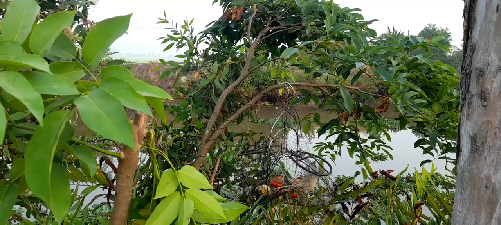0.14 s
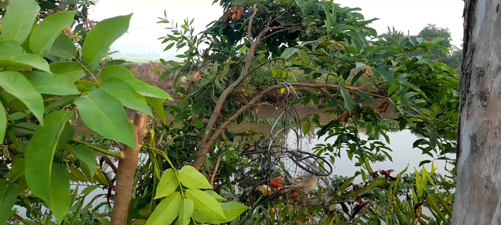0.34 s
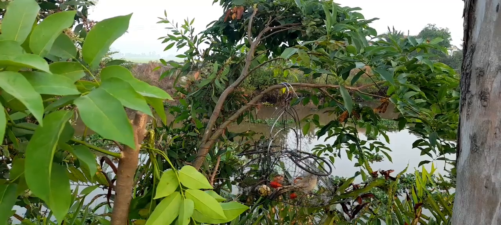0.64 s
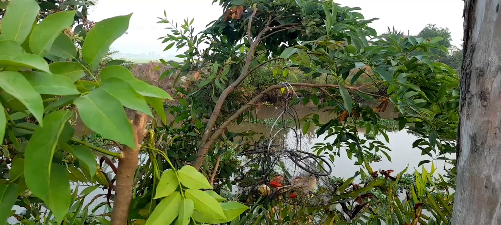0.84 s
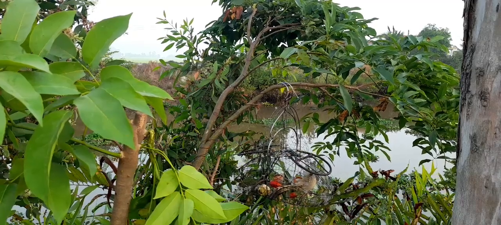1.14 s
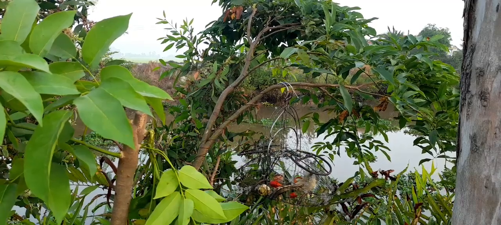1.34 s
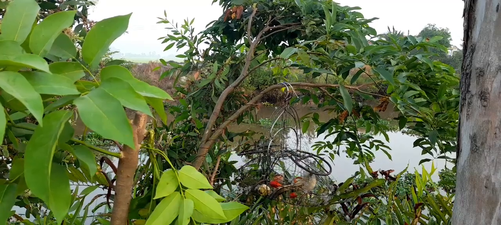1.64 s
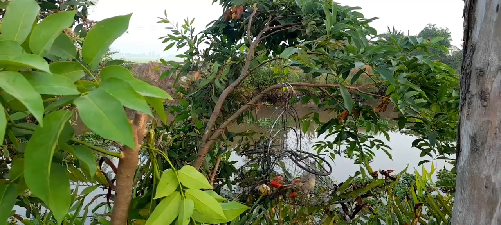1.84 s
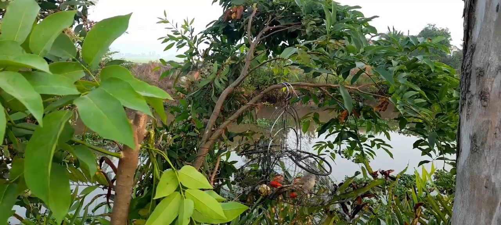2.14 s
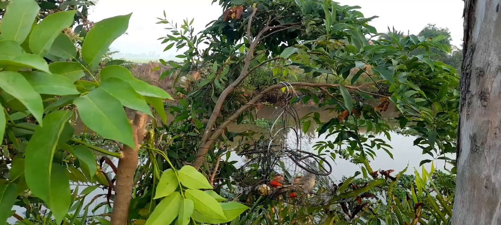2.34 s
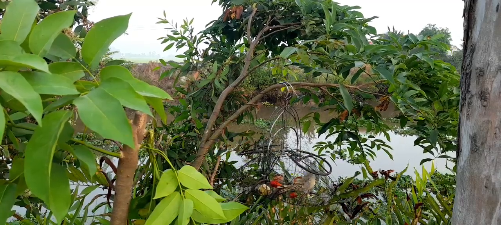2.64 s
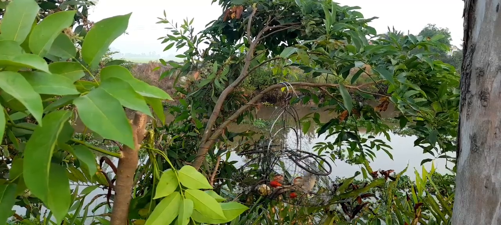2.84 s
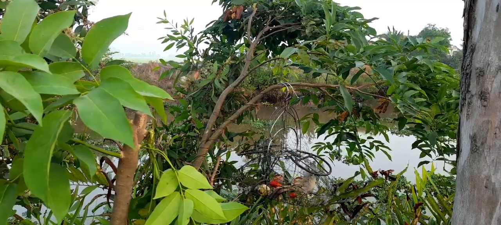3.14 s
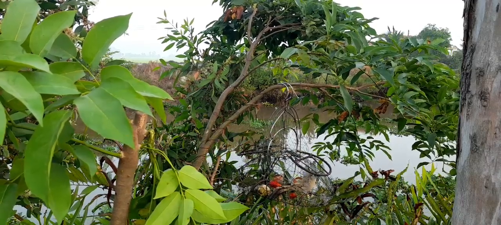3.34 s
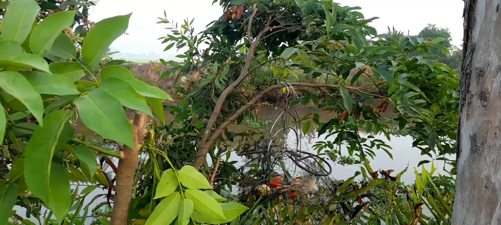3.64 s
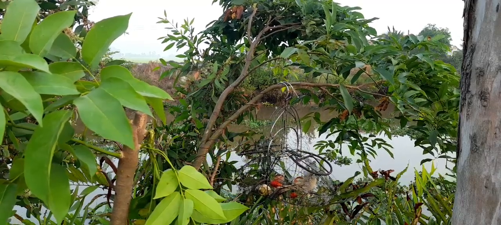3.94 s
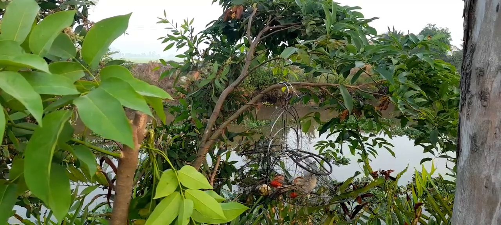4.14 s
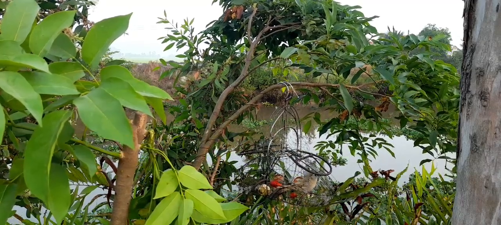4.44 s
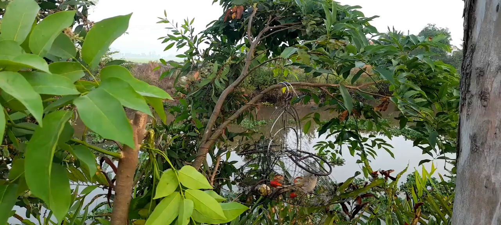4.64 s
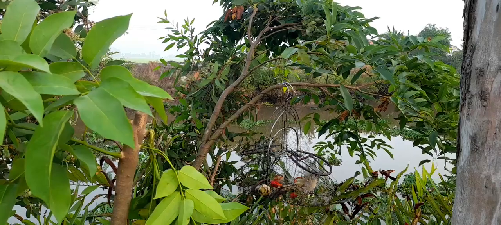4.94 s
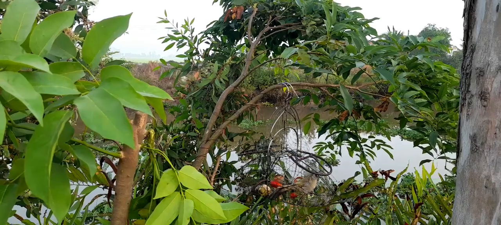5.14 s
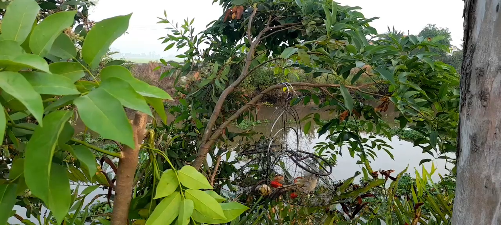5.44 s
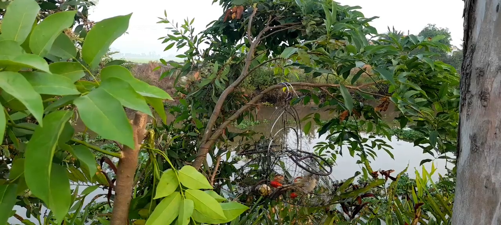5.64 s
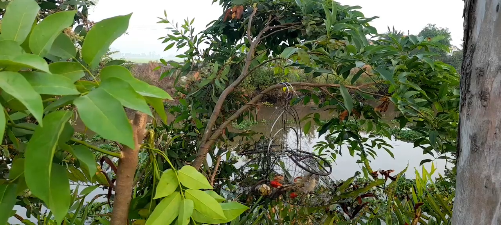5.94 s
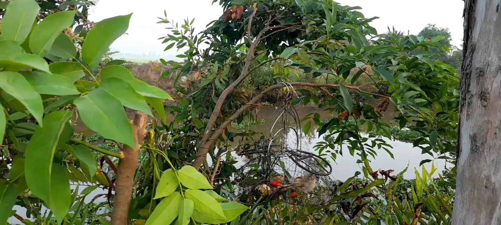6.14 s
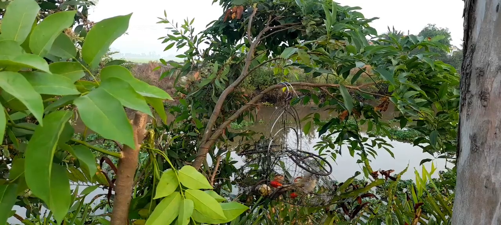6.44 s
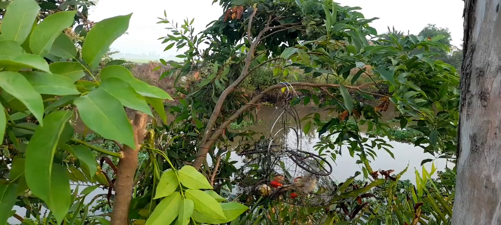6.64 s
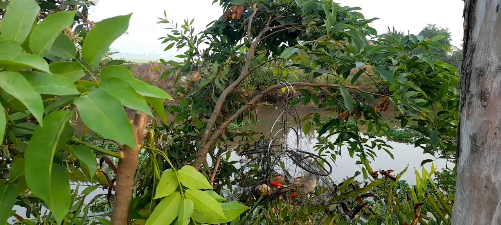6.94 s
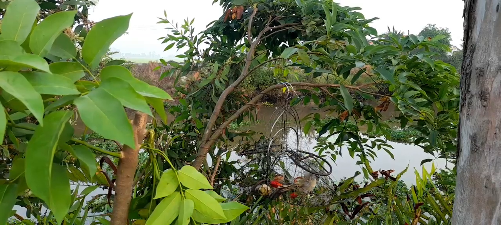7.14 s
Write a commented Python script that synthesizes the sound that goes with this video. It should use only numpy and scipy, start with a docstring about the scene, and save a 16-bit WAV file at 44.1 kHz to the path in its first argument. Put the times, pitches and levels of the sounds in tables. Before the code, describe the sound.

A single-cylinder motorbike is already receding on the right as a second putters in from the left, passes at about two and a half seconds with low thuds, light ticking, chain whirr and tyre noise, then speeds up and fades right. Short rasping chirps, slurred whistles and clear peeps come from nearby bushes. Outdoor stereo microphone, with slight wind rumble and a low, steady hush.

```python
"""From the start a single-cylinder motorbike fades away to the right of a riverside garden: filtered firing pulses.
Light gusts, low noise, rumble on two microphone ports over a steady hush; a second bike putters by from left to
right, its valves ticking as noise bursts struck by the firings. Soon birds in the bushes give rasping chirps
(gliding tones with side tones), then slurred whistles and later peeps (clear glides); far ones sing arched notes."""
import sys
import numpy as np
from scipy import signal
from scipy.fft import rfft, irfft, next_fast_len
from scipy.io import wavfile
from scipy.ndimage import uniform_filter1d, map_coordinates

SR = 44100
rng = np.random.default_rng(int(sys.argv[2]) if len(sys.argv) > 2 else 0)


def pcm_store(signal):
    """Save signal as 16-bit PCM."""
    levels = np.round(np.clip(np.atleast_2d(signal), -1, 1) * 32767)
    wavfile.write(sys.argv[1], SR, levels.astype(np.int16).T)


N = 321930
TIME = np.arange(N) / SR


def amp(db):
    """Decibels to gain."""
    return 10 ** (np.asarray(db) / 20)


def unit(x):
    """Scale to rms 1."""
    return x / np.sqrt(np.mean(x ** 2) + 1e-20)


def since(s):
    """Seconds elapsed after a moment, zero before it."""
    return np.maximum(TIME - s, 0)


def along(points, hz):
    """Interpolate (frequency [Hz], value) points on a log-frequency axis."""
    f, v = np.transpose(points)
    return np.interp(np.log(hz + 1), np.log(f + 1), v)


def curves(rows, at=TIME):
    """One curve for each column after the first."""
    s, *cols = np.transpose(rows)
    return [np.interp(at, s, c) for c in cols]


def wobble(rate_hz):
    """Smooth random curve with rate_hz knots a second."""
    knots = rng.standard_normal(int(N * rate_hz / SR) + 4)
    return map_coordinates(knots, [TIME * rate_hz])


def colour(x, spectrum):
    """Minimum-phase filter through (frequency [Hz], level [dB]) points; the result has rms 1."""
    m = 2 * next_fast_len(N // 2 + SR // 4)
    gain = amp(along(spectrum, np.fft.rfftfreq(m, 1 / SR)))
    # folding the cepstrum makes the filter causal
    cepstrum = irfft(np.log(gain), m)
    cepstrum[1:m // 2] *= 2
    cepstrum[m // 2 + 1:] = 0
    response = np.exp(rfft(cepstrum))
    return unit(irfft(rfft(x, m) * response, m)[..., :N])


def delayed(x, delay_s):
    """x arriving later by a steady or moving delay."""
    return map_coordinates(x, [(TIME - delay_s) * SR], order=3)


PORT_LAG_S = .0005


def placed(x, bearing, right_db):
    """A source at bearing -1 (left) to 1 (right) reaches the nearer port first; right_db favours the right."""
    left = delayed(x, bearing * PORT_LAG_S / 2) * amp(-right_db / 2)
    right = delayed(x, -bearing * PORT_LAG_S / 2) * amp(right_db / 2)
    return np.array([left, right])


def rush(spectrum, bearing, right_db, scatter):
    """Noise from one direction, with a power share scattered by the foliage."""
    direct, *diffuse = colour(rng.standard_normal((3, N)), spectrum)
    scatter = np.clip(scatter, 0, 1)
    return np.sqrt(1 - scatter) * placed(direct, bearing, right_db) + np.sqrt(scatter) * np.array(diffuse)


def firings(rate_hz, first_s):
    """Moments at which an engine with this firing rate completes a cycle."""
    cycles = np.cumsum(rate_hz) / SR
    cycles -= np.interp(first_s, TIME, cycles)
    return np.interp(np.arange(int(cycles[-1]) + 1), cycles, TIME)


def pulses(times, jitter_s, uneven_db):
    """One impulse per firing, uneven in time and size."""
    chance = rng.standard_normal((len(times), 2))
    at = np.clip((times + jitter_s * chance[:, 0]) * SR, 0, N - 1).astype(int)
    return np.bincount(at, amp(uneven_db * chance[:, 1]), N)


def bursts(beats, snap_s, tail_s, tail_db, steady_db):
    """Envelope of noise struck once a cycle: a snap, a tail and a steady bed; rms 1."""
    t = TIME[:SR // 16]
    decay = np.exp(-t / snap_s) + amp(tail_db) * np.exp(-t / tail_s)
    shape = decay * (1 - np.exp(-t / 0.00019))
    return unit(signal.fftconvolve(beats, shape)[:N] + amp(steady_db))


# firing rate: (time [s], rate [1/s])
LEAVING_RATE = [(0, 23.78), (.5, 24.06), (1, 24.51), (1.9, 24.22)]
# exhaust, whirr and valve tick spectra: (frequency [Hz], relative level [dB])
LEAVING_PUFF_SPECTRUM = [(25, -56.5), (60, -8), (115, 6.5), (150, -1), (195, -9.5), (310, 4), (430, -10),
                         (530, -7), (750, -12), (1100, -20.5), (3000, -68)]
LEAVING_WHIRR_SPECTRUM = [(400, -17), (800, 10), (1200, -4), (1700, 2.5), (2400, 0.5), (2950, -3.5),
                          (3600, -3.5), (4500, -4.5), (8000, -16.5), (13000, -14), (16000, -76)]
TICK_SPECTRUM = [(2000, -28.5), (3800, -9.5), (6000, -1), (8100, -10), (9500, -4), (12500, 2.5),
                 (15200, 1.5), (16000, -8.5)]
LEAVING_DB, RECEDE_DB_PER_S, HIDDEN_S, HIDDEN_DB_PER_S = -33.5, 4, 2.9, 24


def leaving_bike(whine_hz=2500, whine_db=-15):
    """A slower exhaust recedes on the right, with whirr, faint valve ticks and a thin whine from its gears."""
    times = firings(curves(LEAVING_RATE)[0], first_s=.0165)
    puffs = pulses(times, jitter_s=.00015, uneven_db=1)
    # a roadside wall returns each puff
    echoed = puffs + 0.14 * delayed(puffs, 0.01162)
    exhaust = -colour(echoed, LEAVING_PUFF_SPECTRUM)
    gate = bursts(puffs, snap_s=.002, tail_s=.012, tail_db=-10, steady_db=-15)
    gas = amp(-10) * colour(gate * rng.standard_normal(N), LEAVING_PUFF_SPECTRUM)
    whirr = amp(-10) * bursts(puffs, snap_s=.001, tail_s=.004, tail_db=-4, steady_db=-6)
    whirr = whirr * rush(LEAVING_WHIRR_SPECTRUM, .95, right_db=1.5, scatter=.55)
    ticks = amp(-17.5) * bursts(puffs, snap_s=.003, tail_s=.009, tail_db=-6, steady_db=-5)
    ticks = ticks * rush(TICK_SPECTRUM, 0.9, right_db=6, scatter=0.76)
    whine_phase = 2 * np.pi * whine_hz * TIME + 1.4 * wobble(90)
    whine = amp(whine_db) * wobble(160) * np.sin(whine_phase)
    level_db = LEAVING_DB - RECEDE_DB_PER_S * TIME - HIDDEN_DB_PER_S * since(HIDDEN_S)
    return amp(level_db) * (placed(exhaust + gas + whine, 0.99, right_db=1.0) + whirr + ticks)


# gusts on the ports: (time [s], half-width [s], relative peak [dB])
GUST_TIMES = [(.18, 0.23, -31), (1.65, 0.03, -31.5), (6.2, 0.066, -37.5), (6.46, 0.058, -36),
              (7.24, 0.091, -41)]
# port rumble; far traffic and leaves: (frequency [Hz], relative level [dB])
BUFFET_SPECTRUM = [(20, -37), (45, -6.5), (70, -7.5), (95, 0.5), (130, -10.5), (200, -28), (500, -55)]
AIR_SPECTRUM = [(15, -38), (25, 1), (87, 1.5), (149, -14.5), (206, -12.5), (317, -22.5), (936, -36),
                (1480, -39), (3160, -75), (4610, -37), (7710, -63), (14000, -63), (16000, -65)]
BREEZE_DB, CALMING_DB_PER_S = -41.5, 1.4  # wind between gusts


def breeze():
    """Gusts swell from a dying breeze and rumble on the ports, increasingly the right, over an outdoor hush."""
    gusts = sum(amp(db) / (1 + ((TIME - s) / width_s) ** 4) for s, width_s, db in GUST_TIMES)
    strength = np.hypot(gusts, amp(BREEZE_DB - CALMING_DB_PER_S * TIME))
    right_db = np.interp(TIME, [2, 6.2], [1, 9])
    buffet = strength * amp(1.1 * wobble(12)) * rush(BUFFET_SPECTRUM, -.5, right_db, scatter=.25)
    hush = amp(-44 + 1.9 * wobble(1.73)) * rush(AIR_SPECTRUM, 0.68, right_db=6.5, scatter=0.43)
    return buffet + hush


def pass_by(peak_db, loudest_s, width_s, open_s, hidden_s, emerge_db, vanish_db):
    """Level in dB of a passing source: it falls with distance, and faster while screened."""
    screened_db = emerge_db * np.maximum(open_s - TIME, 0) + vanish_db * since(hidden_s)
    return peak_db - 10 * np.log10(1 + ((TIME - loudest_s) / width_s) ** 2) - screened_db


# puffs from the side and from behind; chamber resonance: (frequency [Hz], relative level [dB])
ABREAST_SPECTRUM = [(25, 10), (60, -42), (88, -2), (120, 5.5), (148, 5.5), (180, -3), (225, -10.5),
                    (315, -15), (400, -19.5), (700, -19.5), (1200, -27.5), (3000, -54)]
ASTERN_SPECTRUM = [(25, -19), (60, -7.5), (95, 5), (150, -2), (235, -14.5), (290, -12.5), (340, -10.5),
                   (420, -23), (550, -38.5), (730, -35), (1200, -32.5), (3000, -73)]
SILENCER_SPECTRUM = [(100, -7.5), (240, -17), (290, -4.5), (318, 2), (348, -5.5), (400, -31), (800, -52.5)]
# exhaust beams backward; bushes and rider screen it outside a span: (relative peak [dB], loudest at [s],
# half-width [s], open from [s], open until [s], emerging [dB/s], vanishing [dB/s])
EXHAUST_PASSAGE = (-26, 3, 0.69, 2.5, 5.5, 2.5, 4.5)


def passing_exhaust(puffs):
    """Puffs turn from side to rear colour, ring the silencer's chamber and drag turbulent gas behind them."""
    behind = np.clip((TIME - 3.3) / 1.07, 0, 1)
    exhaust = -((1 - behind) * colour(puffs, ABREAST_SPECTRUM) + behind * colour(puffs, ASTERN_SPECTRUM))
    # ring against puff is strongest as the pipe's mouth turns towards the garden
    ring_db = np.interp(TIME, [1.5, 3, 4.1, 5.5], [-9.0, -13.5, -7.0, -15.5])
    exhaust -= amp(ring_db) * colour(puffs, SILENCER_SPECTRUM)
    gate = bursts(puffs, snap_s=.005, tail_s=.012, tail_db=-3, steady_db=-9)
    gas_spectrum = [(60, -14), (130, -3), (220, -8), (320, 0), (420, -12), (700, -17), (1500, -40)]
    exhaust += amp(-21) * colour(gate * rng.standard_normal(N), gas_spectrum)
    return amp(pass_by(*EXHAUST_PASSAGE)) * exhaust


# (relative peak [dB], loudest at [s], half-width [s], open from [s], open until [s],
# emerging [dB/s], vanishing [dB/s])
BOOM_PASSAGE = (-29.5, 2.5, 0.8, 1.23, 4.5, 27, 8.5)


def crank_boom(puff_times):
    """A cosine at two cycles per firing, locked to the puffs."""
    crank = 2 * np.interp(TIME - .004, puff_times, np.arange(len(puff_times)))
    level_db = pass_by(*BOOM_PASSAGE) + 1.2 * wobble(5.83)
    return np.sqrt(2) * np.cos(2 * np.pi * crank) * amp(level_db)


# ticks beam forward; sharp and blurred parts: (relative peak [dB], loudest at [s], half-width [s],
# open from [s], open until [s], emerging [dB/s], vanishing [dB/s])
TICK_PASSAGE = (-43.6, 1.55, .8, 1.47, 3.9, 44, 14)
BLUR_PASSAGE = (-51, 3.05, 1.18, 3, 5.5, 1, 10)


def valve_ticks(valves, bearing):
    """Noise struck by the valves, sharpest from the front; from behind the rider screens it."""
    sharp = bursts(valves, snap_s=.001, tail_s=.007, tail_db=-17, steady_db=-26)
    blurred = bursts(valves, snap_s=0.0014, tail_s=0.0094, tail_db=-11, steady_db=2)
    clatter = amp(pass_by(*TICK_PASSAGE)) * sharp + amp(pass_by(*BLUR_PASSAGE)) * blurred
    return amp(2.0) * clatter * rush(TICK_SPECTRUM, bearing, right_db=5, scatter=0.62)


# (frequency [Hz], relative level [dB])
WHIRR_SPECTRUM = [(600, -27.5), (1100, -5.5), (1650, 6), (2300, -0.5), (2950, -4.5), (3450, 3.5),
                  (4000, 2.5), (4800, 1.5), (6300, -1), (7600, -14.5), (11000, -59), (16000, -11)]
# (relative peak [dB], loudest at [s], half-width [s], open from [s], open until [s],
# emerging [dB/s], vanishing [dB/s])
WHIRR_PASSAGE = (-44.5, 3, 0.87, 0, 5.5, -1, 6.5)


def engine_whirr(valves, bearing):
    """Engine whirr, pulsing gently with the engine cycle."""
    pulse = bursts(valves, snap_s=0.00092, tail_s=0.022, tail_db=13.0, steady_db=13)
    noise = rush(WHIRR_SPECTRUM, bearing, right_db=1.2 * bearing + 8.5, scatter=0.42)
    return amp(pass_by(*WHIRR_PASSAGE) + 2) * pulse * noise


# (frequency [Hz], relative level [dB])
TYRE_SPECTRUM = [(120, -25.5), (300, 9), (450, 1), (550, 0), (620, -2.5), (700, 2), (790, -6), (880, -1),
                 (1200, -2), (2000, -7.5), (3000, -15), (5000, -24), (9000, -30.5)]
# (relative peak [dB], loudest at [s], half-width [s], open from [s], open until [s],
# emerging [dB/s], vanishing [dB/s])
TYRE_PASSAGE = (-42, 2.5, 0.62, -1, 5.5, -8, 4)


def tyre_noise(bearing):
    """Rolling noise with a slightly unsteady level."""
    level_db = pass_by(*TYRE_PASSAGE) + 7 + 0.5 * wobble(9)
    return amp(level_db) * rush(TYRE_SPECTRUM, bearing, right_db=1.0, scatter=0.14)


FIRST_FIRING_S, START_RATE_HZ, CREEP_HZ_PER_S = .0095, 28.0406, .3301
THROTTLE_S, THROTTLE_HZ_PER_S = 2.828, .881  # the rider opens the throttle: extra gain in firing rate


def passing_bike(abreast_s=2.401, crossing_s=0.75):
    """Exhaust puffs, crank boom, valve ticks, engine whirr and tyres cross from left to right."""
    bearing = (TIME - abreast_s) / np.hypot(TIME - abreast_s, crossing_s)
    rate_hz = START_RATE_HZ + CREEP_HZ_PER_S * TIME + THROTTLE_HZ_PER_S * since(THROTTLE_S)
    times = firings(rate_hz, FIRST_FIRING_S)
    # the pipe is at the tail, so its puff trails the valve tick while the bike approaches
    puff_times = times + np.interp(times, [2.7, 3.9], [.005, .0005])
    puffs = pulses(puff_times, jitter_s=0.000089, uneven_db=1.0)
    valves = pulses(times, jitter_s=.0002, uneven_db=2.8)
    low = placed(passing_exhaust(puffs) + crank_boom(puff_times), bearing, right_db=2)
    return low + valve_ticks(valves, bearing) + engine_whirr(valves, bearing) + tyre_noise(bearing)


def gesture(shape, length_s):
    """Progress 0-1 through a call, then its smoothed control curves."""
    u = np.linspace(0, 1, int(length_s * SR))
    return u, *uniform_filter1d(np.array(curves(shape, u)), size=130, axis=1)


def tremble(u):
    """Random unsteadiness over one call."""
    return map_coordinates(rng.standard_normal(16), [u * 15])


# (share of the call [0-1], pitch ratio, relative level [dB], rasp [0-1])
CHIRP_SHAPE = [(0, 1.22, -15, 0.53), (.098, 1.1, -1, 0.11), (.218, .9, -7, 1), (.34, .82, -3.5, 1),
               (.462, .92, -12.5, 1), (.57, 1.1, 2, 0.04), (.699, 1.02, -1.5, 0.4),
               (.85, 0.81, -10.5, 0.33), (1, 1.025, -8, 1)]
# throat of the rasping birds: (frequency [Hz], relative level [dB])
THROAT_SPECTRUM = [(1700, 10), (2500, 2.5), (3300, 1.5), (4200, -4), (5200, -14.5), (6500, -20.5)]


def chirp(length_s, hz, second_hz, rasp_db):
    """A gliding tone to which a second voice in the syrinx adds rasping side tones."""
    u, ratio, level_db, rasp = gesture(CHIRP_SHAPE, length_s)
    ratio = ratio * (1 + .028 * (.2 + rasp) * tremble(u))
    turn = 2 * np.pi * np.cumsum(ratio) / SR
    tone = np.sin(hz * turn)
    # side tones are spaced evenly above the main tone and shaped by the throat
    for k in range(1, 5):
        side_hz = hz + k * second_hz / ratio.min()
        side_db = rasp_db + along(THROAT_SPECTRUM, side_hz * ratio) + 4 * tremble(u)
        tone += rasp * amp(side_db) * np.sin(side_hz * turn + rng.uniform(0, 2 * np.pi))
    return amp(level_db) * tone


SETTLE_SHARE = .45  # of the call


def note(shape, length_s, hz, overtone_db=-30, sharp=0):
    """One clear gliding tone with an octave overtone, which may start high and settle."""
    u, ratio, level_db = gesture(shape, length_s)
    settling = 1 + sharp * np.maximum(1 - u / SETTLE_SHARE, 0)
    ratio = ratio * settling * (1 + .028 * 0.48 * tremble(u))
    phase = 2 * np.pi * hz * np.cumsum(ratio) / SR
    return amp(level_db) * (np.sin(phase) + amp(overtone_db) * np.sin(2 * phase))


def sung(calls):
    """Lay (time [s], level [dB], sound) calls out in time, with soft edges."""
    out = np.zeros(N + SR)
    for s, db, sound in calls:
        edges = signal.windows.tukey(len(sound), .1)
        out[round(s * SR):][:len(sound)] += np.sqrt(2) * amp(db) * sound * edges
    return out[:N]


# rasping chirps: (time [s], length [s], base pitch [Hz], relative level [dB],
# second voice [Hz], relative rasp level [dB])
CHIRP_CALLS = [(0.153, 0.056, 2244, -35.5, 765, 6), (0.174, 0.023, 2640, -35.5, 625, 9.5),
               (.401, 0.054, 2465, -29.5, 980, 0), (2.853, 0.054, 2080, -32.5, 756, 3),
               (2.877, 0.034, 2492, -29.5, 550, -6), (4.373, 0.059, 2337, -28.5, 964, -1.5),
               (5.429, 0.056, 2355, -31.5, 1030, 0.5), (5.655, 0.05, 2504, -30.5, 980, -2),
               (6.837, .047, 1920, -57, 332, -5), (6.867, 0.045, 1560, -58, 237, -8)]
# slurred whistles: (time [s], length [s], relative level [dB], share by which the pitch starts high)
WHISTLE_CALLS = [(1.342, 0.12, -32.5, 0), (1.892, 0.089, -31.5, 0.088), (3.45, .116, -31.5, 0.0033)]
# peeps: (time [s], relative level [dB])
PEEP_CALLS = [(4.553, -27), (4.74, -30), (5.894, -32.5)]
# note shapes: (share of the call [0-1], pitch ratio, relative level [dB])
WHISTLE_SHAPE = [(0, 1.03, -9), (.08, 1.075, -2), (.2, .995, -1.5), (.4, 1.005, -1), (.53, .977, -2),
                 (.68, 1.017, -1), (.84, .975, -2), (1, .87, -11)]
PEEP_SHAPE = [(0, 1.3, -21), (.1, 1.17, -8.5), (.27, .87, -1.5), (.47, 1.047, 1.5), (.63, .99, 0.5),
              (.8, .99, 1), (1, 0.94, -11)]
WHISTLE_BASE_HZ, WHISTLE_OVERTONE_DB = 1508, -14
PEEP_S, PEEP_BASE_HZ, PEEP_OVERTONE_DB = 0.05, 2367, -42


def birds():
    """Near birds chirp, whistle and peep in the bushes."""
    chirps = [(s, db, chirp(length_s, hz, second_hz, rasp_db))
              for s, length_s, hz, db, second_hz, rasp_db in CHIRP_CALLS]
    whistles = [(s, db, note(WHISTLE_SHAPE, length_s, WHISTLE_BASE_HZ, WHISTLE_OVERTONE_DB, sharp))
                for s, length_s, db, sharp in WHISTLE_CALLS]
    peeps = [(s, db, note(PEEP_SHAPE, PEEP_S, PEEP_BASE_HZ, PEEP_OVERTONE_DB)) for s, db in PEEP_CALLS]
    return sung(chirps + whistles + peeps)


# single notes from across the water: (time [s], length [s], base pitch [Hz], relative level [dB])
FAR_CALLS = [(1.456, 0.12, 1002, -43.5), (2.679, 0.035, 578, -32.5), (5.19, 0.083, 558, -48),
             (7.235, .018, 6170, -52.5), (7.266, 0.022, 4960, -53)]
# (share of the call [0-1], pitch ratio, relative level [dB])
ARCH_SHAPE = [(0, .88, -6), (.45, 1.02, -2.5), (1, .96, -22)]
# means of a far bird's loose run
RUN_START_S, RUN_GAP_S, RUN_NOTE_S, RUN_BASE_HZ, RUN_DB = 5.815, .095, .06, 970, -58.5
TWITTER_S, TWITTER_BASE_HZ, TWITTER_SPREAD, TWITTER_MEAN_DB = .03, 5000, .16, -63


def far_birds():
    """Arched notes from a distance: a few single ones, one loose run and a random high twitter."""
    singles = [(s, db, note(ARCH_SHAPE, length_s, hz)) for s, length_s, hz, db in FAR_CALLS]
    run = []
    for k, (late, loud, long, high) in enumerate(rng.standard_normal(size=(6, 4))):
        s = RUN_START_S + (k + .15 * late) * RUN_GAP_S
        sound = note(ARCH_SHAPE, RUN_NOTE_S * np.exp(.3 * long), RUN_BASE_HZ * np.exp(0.052 * high))
        run.append((s, RUN_DB + 2 * loud, sound))
    twitter = []
    for when, loud, high in rng.random(size=(70, 3)):
        hz = TWITTER_BASE_HZ * np.exp(TWITTER_SPREAD * (2 * high - 1))
        sound = note(ARCH_SHAPE, TWITTER_S, hz)
        twitter.append((when * N / SR, TWITTER_MEAN_DB + 6 * (loud - .5), sound))
    return sung(singles + run + twitter)


# (frequency [Hz], T60 [s])
GARDEN_DECAY = [(200, 0.053), (2500, 0.17), (10000, 0.013)]


def garden(x):
    """Trunks and leaves scatter a short, diffuse tail: noise decaying at its own pace in each band."""
    hz, t, z = signal.stft(rng.standard_normal((2, SR // 2)), SR, nperseg=256)
    decay = amp(-60 * t / along(GARDEN_DECAY, hz)[:, None])
    tail = signal.istft(z * decay, SR, nperseg=256)[1]
    return signal.fftconvolve(x[None], tail / np.linalg.norm(tail[0]), axes=1)[:, :N]


def scene():
    """Road, breeze and birds."""
    song = birds() + far_birds()
    song_field = placed(song, .1, right_db=1.7) + amp(-16) * garden(song)
    return leaving_bike() + breeze() + passing_bike() + song_field


LOW_HZ, TOP_HZ = 40, 16000


def record(dry):
    """Thin the deepest bass and keep nothing from the band limit up."""
    m = next_fast_len(N + SR // 2)
    hz = np.fft.rfftfreq(m, 1 / SR)
    bass = hz ** 8 / (hz ** 8 + LOW_HZ ** 8)
    return irfft(rfft(dry, m) * bass * (hz < TOP_HZ), m)[:, :N]


dry = scene()
out = record(dry)
pcm_store(out)
```